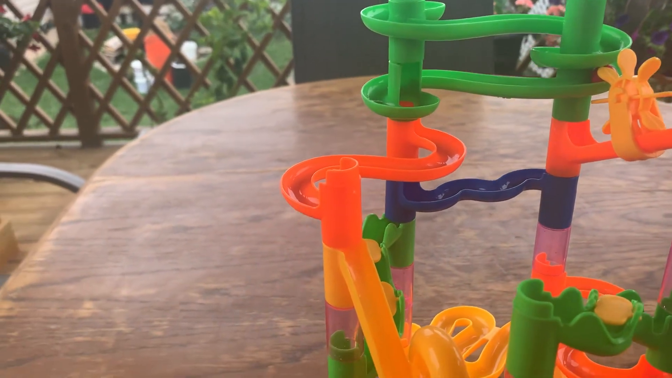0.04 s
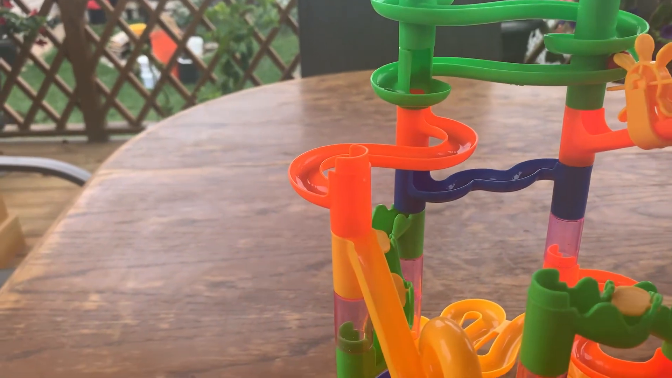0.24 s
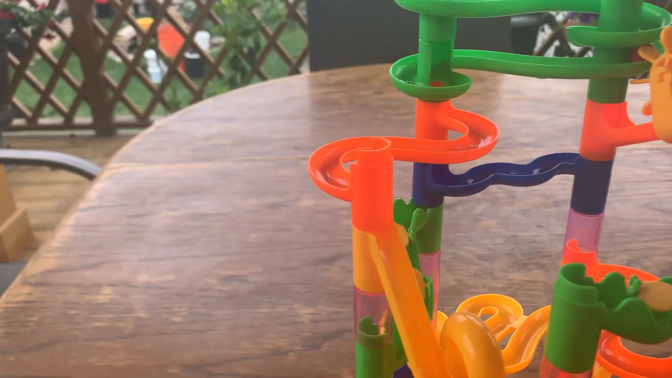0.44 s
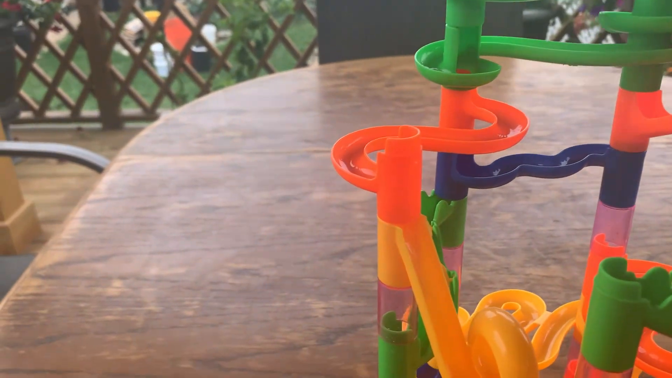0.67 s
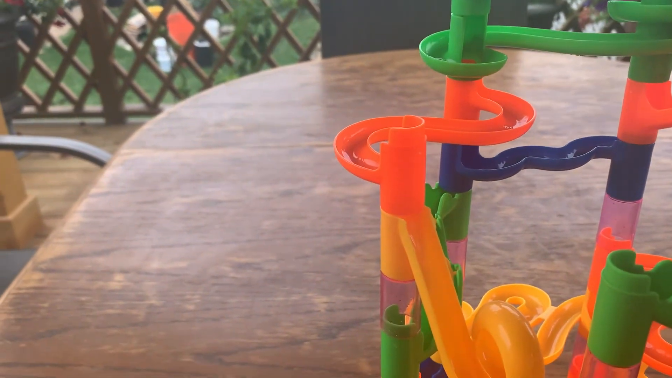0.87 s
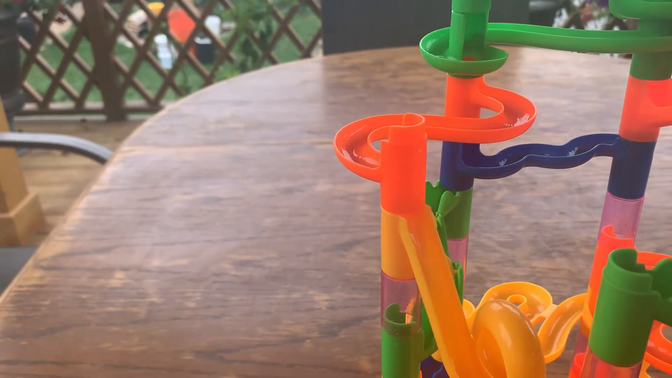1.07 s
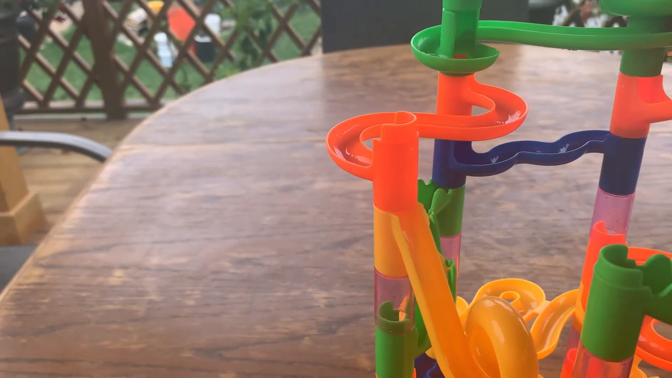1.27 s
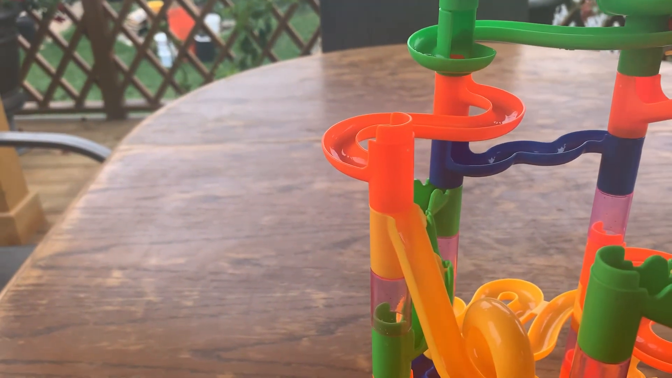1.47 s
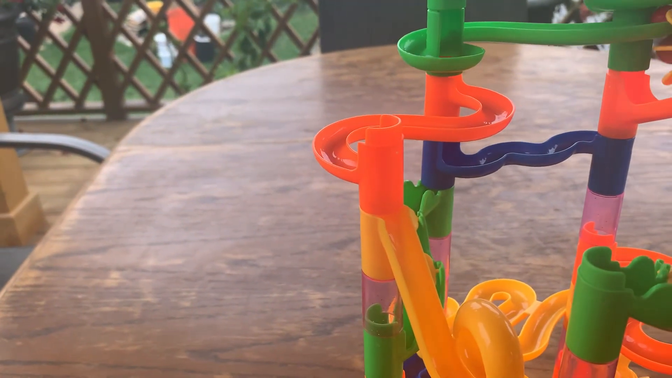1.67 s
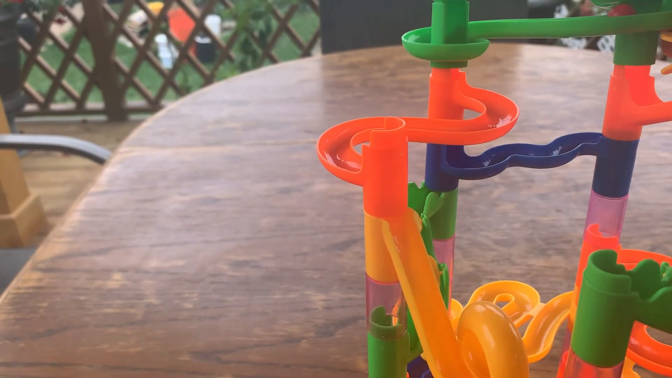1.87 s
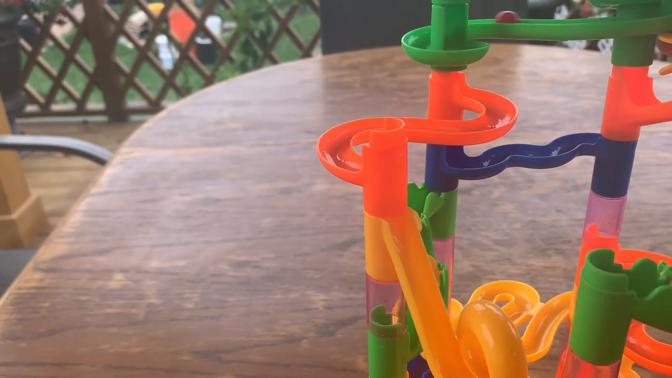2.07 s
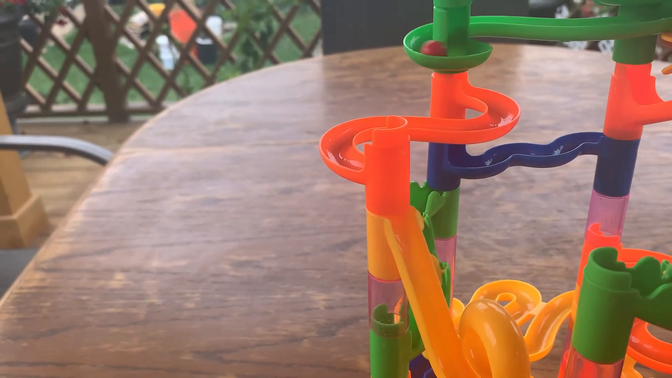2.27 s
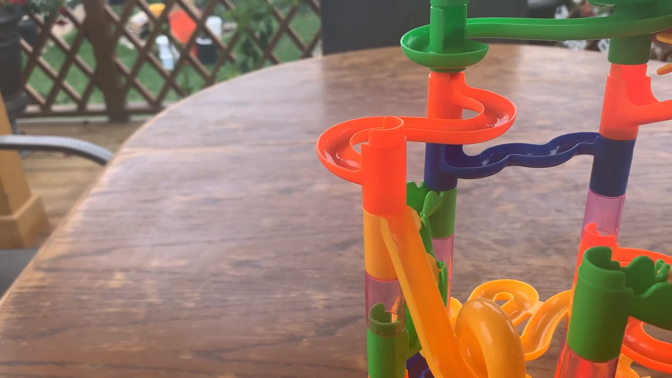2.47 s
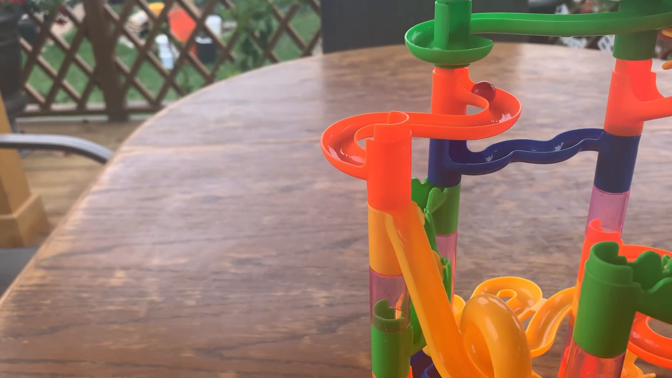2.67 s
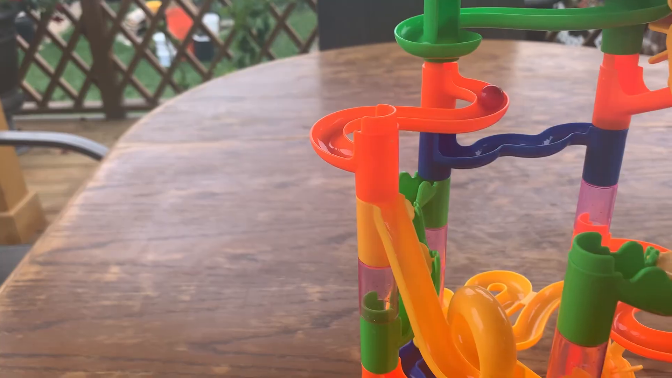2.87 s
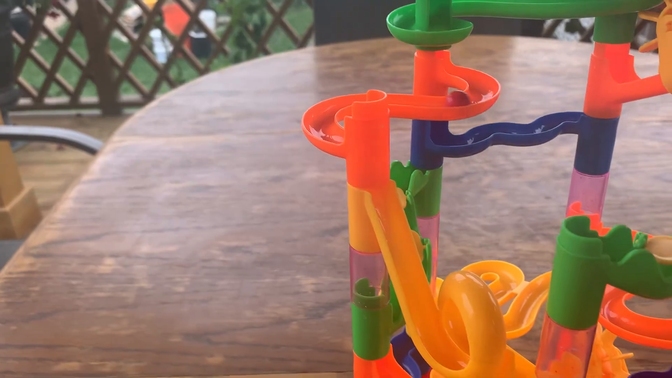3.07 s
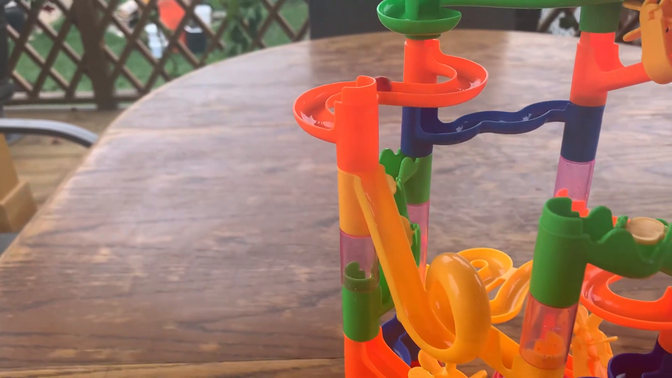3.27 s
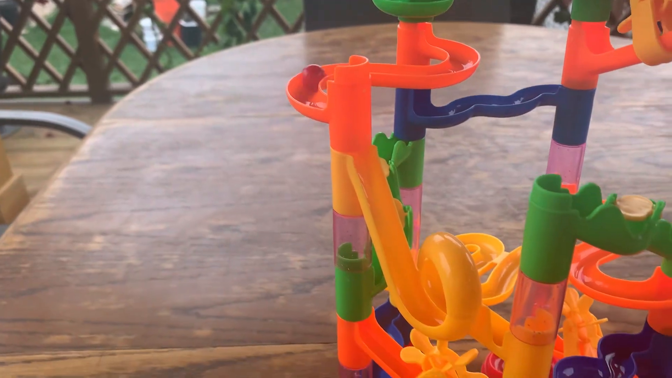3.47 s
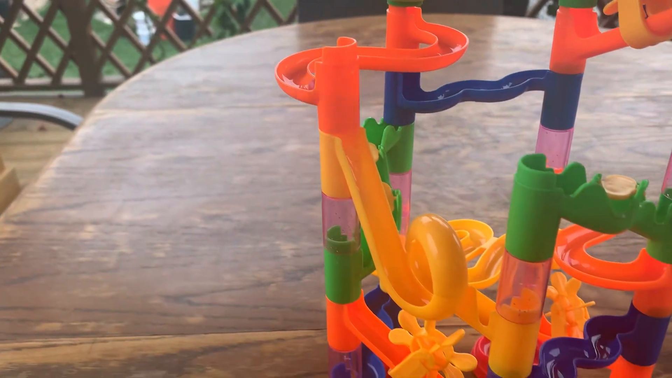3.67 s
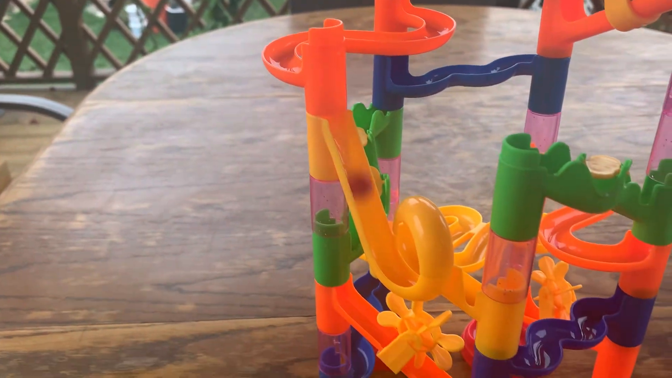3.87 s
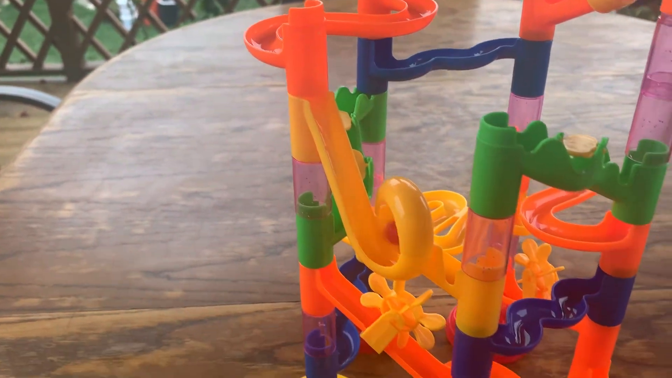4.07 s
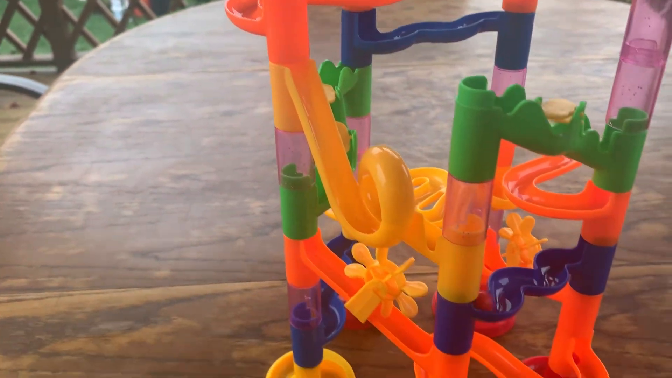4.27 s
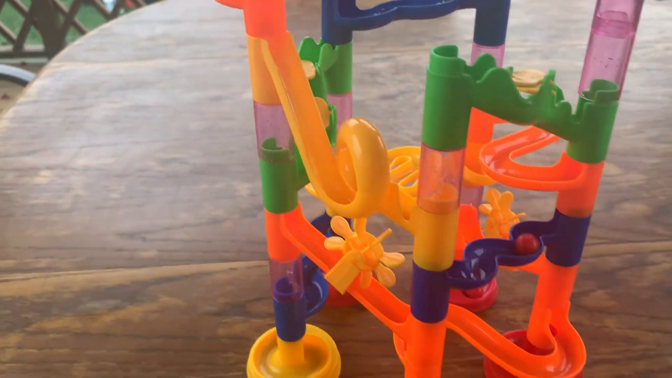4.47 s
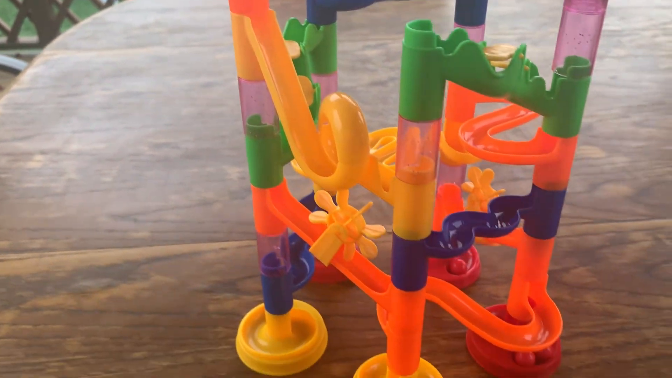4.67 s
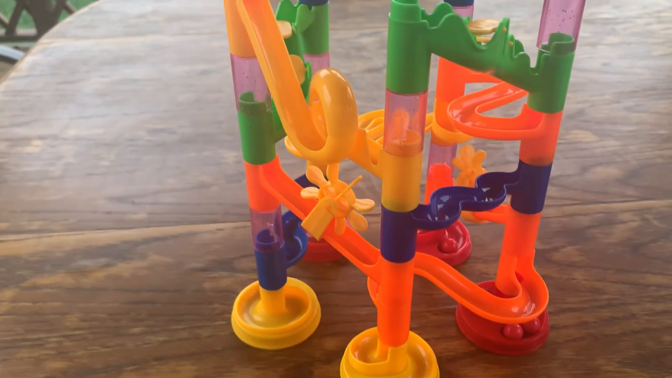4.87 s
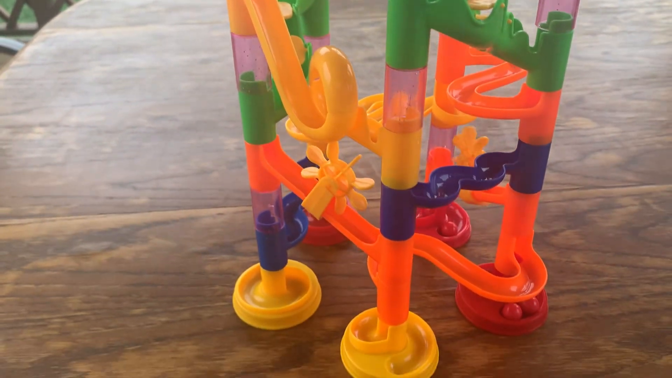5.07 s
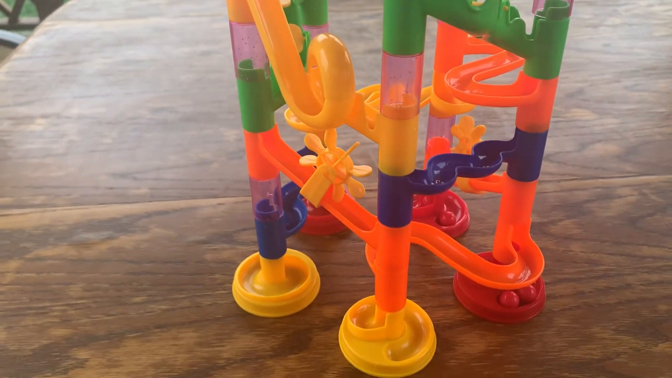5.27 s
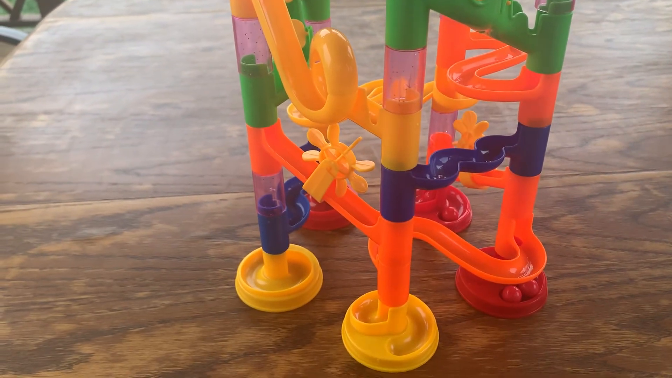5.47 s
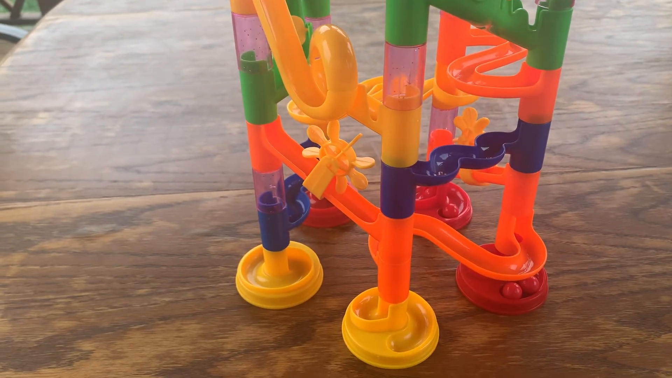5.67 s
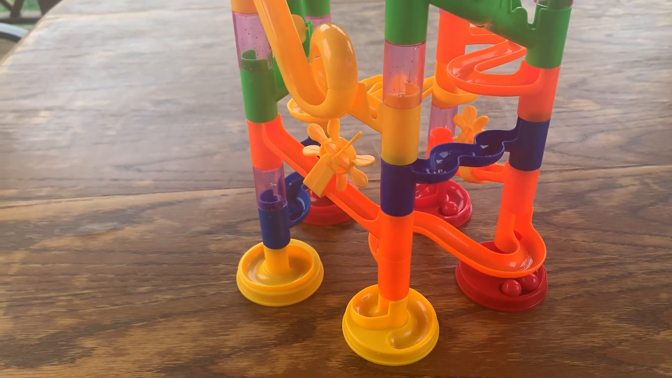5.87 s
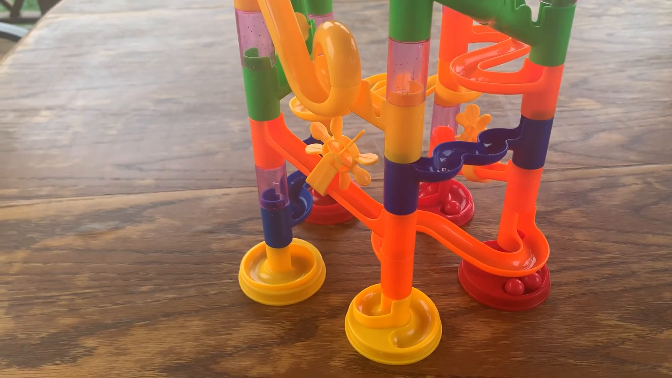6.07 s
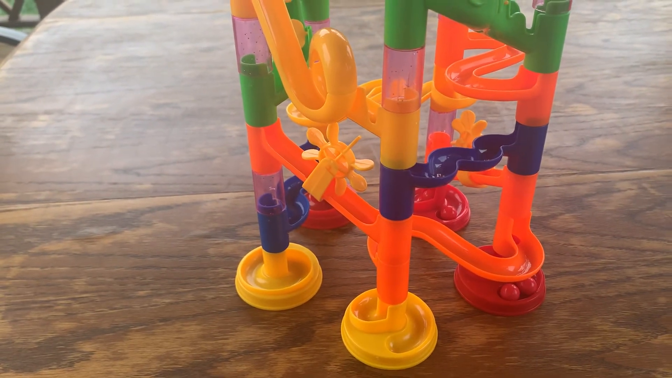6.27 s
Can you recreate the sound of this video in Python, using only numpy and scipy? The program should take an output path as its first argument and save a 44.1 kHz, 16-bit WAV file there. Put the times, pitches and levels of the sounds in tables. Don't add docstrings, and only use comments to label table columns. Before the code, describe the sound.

Faint distant traffic rumbles in the open air. At about 0.6 s a glass marble hits a plastic paddle close by with a light double click, then bounces weakly around 0.75 s and taps softly to 1.25 s. Quiet rolling and tiny joint ticks continue; from 1.9 s a rattle builds to rapid clicks at 2.2-2.35 s. At 2.5 s it drops hard with a sharp clack and quick rebound. A soft slide follows, with thin whining rail tones and ticks from 2.8 to 3.7 s. Crisp clatter breaks out at 3.7-4.0 s, then brighter, denser knocks at 4.07-4.27 s, and a bumpy run at 4.4-4.9 s, with short wooden thuds beneath. It lands hard at 5.0 s, bounces brightly to 5.1 s, and settles faintly by 5.3 s. Only low road noise remains until about 6.3 s.

```python
import sys
import numpy as np
from scipy import signal
from scipy.fft import rfft, irfft, next_fast_len
from scipy.io import wavfile
from scipy.ndimage import uniform_filter1d, map_coordinates

SR = 44100
rng = np.random.default_rng(int(sys.argv[2]) if len(sys.argv) > 2 else 0)


def store_wav(level_fs):
    pcm = np.round(np.clip(np.atleast_2d(level_fs), -1, 1) * 32767)
    wavfile.write(sys.argv[1], SR, pcm.T.astype(np.int16))


def elevation(decibels):
    levels = np.asarray(decibels, float)
    return 10 ** (levels / 20)


N = 279141
SIDES = np.array([[1], [-1]])

# frequency in Hz, time to fade by 60 dB in seconds.
PLASTIC_FADE = [(800, 0.057), (2500, 0.051), (6000, 0.019), (15000, 0.0081)]
# frequency in Hz, lead of the left port in radians.
PORT_LAG = [(0, 0), (1890, 0.2), (3010, 2.2), (4390, 0.6), (5170, 2.6), (6290, 0.0), (7920, -2.6),
            (9390, -3.7), (10500, -6.2), (11600, -6.6), (12700, -9.2), (14300, -9.8), (15200, -12.5),
            (16700, -12.4)]


def unit(x):
    return x / np.sqrt(np.mean(np.abs(x) ** 2) + 1e-20)


def along(points, hz):
    f, v = np.transpose(points)
    return np.interp(np.log(hz + 1), np.log(f + 1), v)


def wobble(rate):
    knots = rng.standard_normal(int(N * rate / SR) + 4)
    return map_coordinates(knots, [np.arange(N) * rate / SR])


def filtered(x, response):
    m = next_fast_len(N + SR // 2)
    return irfft(rfft(x, m) * response(np.fft.rfftfreq(m, 1 / SR)), m)[..., :N]


def add_at(out, piece, start):
    out[..., start:][..., :piece.shape[-1]] += piece


def contacts():
    # start in seconds, peak in dB, hollowness in dB, hardness in dB, strongest ring in Hz.
    paddle = [
        (0.6232, -32.5, -3.5, -7, 6360),
        (0.6369, -28, -4, -2.5, 1300),
        (0.744, -33, -7, -7.5, 1560),
        (0.7743, -36, -0.5, -7, 2255),
        (0.8904, -41.5, -1, -13, 1260),
        (0.9817, -42.5, 3, -11.5, 1600),
        (1.2038, -43, 5, -5, 1730),
        (1.2197, -48, 11.5, -8, 1334),
        (1.239, -47, 3, -13, 1660),
    ]
    funnel = [
        (2.4548, -26.5, -6.5, -4.5, 1753),
        (2.4911, -10.5, -11, -4, 4370),
        (2.514, -39.5, -18.5, -0.9, 6090),
        (2.5319, -20, -7, 0.5, 3090),
    ]
    chute = [(3.7197, -30, -8.5, -2.5, 6780), (3.7275, -21, -4.5, -2.05, 1500),
             (3.7423, -15, -4.5, -1.5, 4310), (3.7965, -25, -5.5, -1, 4440),
             (3.8072, -30.5, -4, -9.5, 4330), (3.8266, -34.5, -15, -19, 4100), (3.8803, -33, 0, -29, 1418),
             (3.8916, -36, -7.5, -12, 1370), (3.9073, -25.5, -5, -1.5, 2560),
             (3.9212, -19, -6.5, -15, 3180), (3.9339, -22.5, -11, -9, 3020),
             (3.945, -21.5, -2, -12.5, 2745), (3.9745, -38, -11, 5, 2380), (3.9934, -48.5, -4.5, -2, 2200)]
    zigzag = [(4.375, -39.5, -6.5, -24, 1915), (4.454, -36.5, -21, -22, 2100),
              (4.488, -37.5, -7, -10, 3700), (4.5055, -24, -8, -7, 1930), (4.544, -34.5, -6, -7, 1885),
              (4.6265, -14, -12, -10, 1754), (4.6447, -17.5, -12.5, -13.5, 4780),
              (4.6566, -28.5, -8, -9, 3970), (4.6665, -13, -6.5, -0.5, 1770), (4.7, -22.5, -17.5, -8, 1640),
              (4.748, -22, -9, -6.5, 1860), (4.784, -32, 2, 3, 7450), (4.7986, -27, -8.5, -6, 1610),
              (4.8177, -35, 0.5, -5.5, 1570), (4.8667, -37, -15.5, -14.5, 1920),
              (4.8874, -35.5, -10.5, -22.5, 1700)]
    dish = [
        (4.9377, -41.5, -1.5, -18, 1720),
        (4.9484, -30.5, -9.5, -19.5, 1680),
        (4.9864, -12, -9.5, -10, 1630),
        (5.0028, -25.5, -3.5, -2, 1830),
        (5.0246, -29.5, -3.5, 10.5, 7100),
        (5.033, -15.5, -3.5, 0.5, 7100),
        (5.0816, -20, -8.5, -8, 1500),
        (5.1123, -25.5, -9, -7.5, 1490),
        (5.2993, -55, 3, -4, 6830),
    ]
    nudges = [(0.75, -43, -5, 1, 1500), (0.901, -47, -4, -3, 1700), (1.1975, -53, -4, -1, 5200),
              (1.787, -70, -2, 2, 5700), (4.5, -58, -3, -23, 1260), (4.4276, -53, -1, -29, 1450),
              (4.473, -40, -2, -7, 1850), (4.94, -44, -8, -11, 5300), (4.2055, -24, -3.5, -3, 5400),
              (4.2, -37, -6, -5.5, 2600), (3.8, -62, -8, -4, 4600), (2, -53, -5.5, -15, 2400),
              (2.19, -46.5, -5.5, -17, 1900)]
    # start in seconds, peak in dB, hardness in dB, strongest ring in Hz.
    ramp = [(1.7786, -64, -1, 1230), (1.931, -45, -11, 4300), (1.9985, -44, -20, 2870),
            (2.0679, -44.5, -12, 4220), (2.1161, -44.5, -12, 1860), (2.154, -47, -8, 1890),
            (2.165, -41, -18.5, 1830), (2.2084, -40.5, -12.5, 2660), (2.2208, -35.5, -20, 2870),
            (2.251, -34.5, -12, 2800), (2.2569, -44.5, -7, 3155), (2.2655, -42.5, -8, 1930),
            (2.2775, -31.5, -10.5, 2010), (2.292, -31.5, -13, 4430), (2.3034, -36, -3, 3040),
            (2.3092, -30.5, -7, 2735), (2.3294, -42.5, -0.5, 1300), (2.3404, -35, -22, 1900)]
    bend = [(2.8421, -54.5, -66, 1414), (3.0643, -54, -26, 2844), (3.1053, -52, -34, 2920),
            (3.2131, -47, -21, 2950), (3.4465, -41, -9.5, 1390), (3.559, -43.5, -22.5, 1830),
            (3.5955, -42.5, -17.5, 1485), (3.6241, -42.5, -22, 1750), (3.6384, -50.5, -32.5, 1670),
            (3.6547, -41.5, -33.5, 2330), (3.677, -39.5, -21, 1280)]
    tube = [(4.0704, -14, 0, 3240), (4.0791, -19.5, -5.5, 6360), (4.0843, -11.5, -1.5, 3400),
            (4.1599, -24, -7.5, 3326), (4.1804, -34, -14.5, 3400), (4.194, -17.5, 0, 5350),
            (4.2037, -30, -11, 6634), (4.2108, -21.5, -11.5, 6930), (4.2283, -23, -3.5, 5650),
            (4.2432, -24.5, -9.5, 4320), (4.2464, -21, -6.5, 4070), (4.2647, -17.5, 0.5, 3990)]

    def rattle(rows, hollow_db):
        return [(s, db, hollow_db - 0.2 * (db + 34.5), hard_db, hz) for s, db, hard_db, hz in rows]

    upper = paddle + rattle(ramp, -6.5) + funnel + rattle(bend, -6)
    return upper + chute + rattle(tube, -2.5) + zigzag + dish + nudges


def knocks(count=14, lead=700):
    # frequency in Hz, level in dB per Hz.
    plastic = [(290, -53.5), (500, -26.5), (1400, -6.5), (2000, -7), (2650, -8.5), (3300, -6.5),
               (3660, -14), (4180, -6.5), (5870, -4), (6810, -0.5), (7600, 0), (8600, -0.5), (9500, 1.5),
               (10100, -1), (12500, -4.5), (13300, -9), (14600, -6), (15600, -8.5), (17000, -51.5)]
    out = np.zeros((2, N + SR))
    for s, db, hollow_db, hard_db, ring_hz in contacts():
        tilt = [(1700, hollow_db), (3500, 0.0035), (6500, 0.91 * hard_db), (11000, 1.1 * hard_db)]

        def colour_db(f):
            hump = 6 * np.exp(-(np.log((f + 1) / ring_hz) / 0.1) ** 2)
            return along(plastic, f) + along(tilt, f) + hump

        chance = rng.standard_normal((2, count))
        place = (np.arange(1, count) - rng.random(count - 1)) / count
        hz = np.append(ring_hz, 800 * (11000 / 800) ** place)
        level = elevation(colour_db(hz) + np.append(3, 2.4 * chance[0, 1:])) * np.sqrt(hz / 4000)
        t60 = 0.88 * along(PLASTIC_FADE, hz) * elevation(1.2 * chance[1])
        rings = strike(hz, level, t60, chatter_s=0.00078)
        body = clatter(colour_db, lead)
        start = round(s * SR)
        add_at(out, elevation(db - 1.5) * rings, start - 20)
        add_at(out, elevation(db - 4.0) * body, start - lead - 10)
    return out[:, :N]


def clatter(colour_db, lead, size=4096):
    t = (np.arange(size) - lead) / SR
    hz = np.fft.rfftfreq(size, 1 / SR)
    after = np.maximum(t, 0)
    bumps = map_coordinates(rng.standard_normal(size // 64 + 2), [np.arange(size) / 64], order=1)
    lumps = elevation(5.1 * (1 - np.exp(-np.abs(t) / 0.0039)) * bumps)
    rustle = elevation(-26.5 + 60 * np.minimum(t, 0) / 0.02)
    rise = (1 - np.exp(-after / 0.00074)) + rustle
    fade_s = np.array([[.011], [.08]])
    fast, slow = rise * lumps * elevation(-60 * after / fade_s)
    shared, own = rng.standard_normal((2, 2, size))

    def burst(k, envelope):
        return rfft((shared[k] + 0.3 * SIDES * own[k]) * envelope)

    slow_share = np.clip(along([(1500, 0.46), (5000, 0.22), (10000, 0.018)], hz), 0, 1)
    humps = map_coordinates(rng.standard_normal(size // 80 + 2), [np.arange(len(hz)) / 40])
    colour = elevation(colour_db(hz) + 3.5 * humps)
    middle = (hz > 2500) & (hz < 5000)
    colour = colour / np.sqrt(np.sum(colour[middle] ** 2) * 2 / size)
    lag = np.exp(.5j * SIDES * along(PORT_LAG, hz))
    return irfft((burst(0, fast) + slow_share * burst(1, slow)) * colour * lag, size)


def strike(hz, level, t60, chatter_s):
    t = np.arange(SR // 14) / SR
    chance = rng.random((2, len(hz)))
    modes = np.exp(((2j * np.pi * hz - np.log(1000) / t60)[:, None] * t).astype(np.complex64))
    lag = along(PORT_LAG, hz) + 2.6 * (chance[1] - .5)
    phase = 2 * np.pi * chance[0] + .5 * SIDES * lag
    rings = (level * np.exp(1j * phase) @ modes).imag * (1 - np.exp(-t / 0.0022))
    contact = t[:300] / chatter_s
    chatter = contact * np.exp(-contact) * rng.standard_normal(300) ** 3
    return signal.fftconvolve(rings, chatter[None] / np.linalg.norm(chatter), axes=1)


def ticks(count=24):
    # start in seconds, peak in dB, ring in Hz.
    joints = [(0.924, -54, 1402), (0.9923, -48, 1705), (1.2805, -42, 1910), (1.2986, -43.5, 1960),
              (1.3284, -50, 2060), (1.5755, -50.5, 1420), (1.6227, -50, 1860), (1.6578, -52.5, 1630),
              (1.7067, -63, 1740), (1.763, -52, 1890), (1.8144, -50.5, 2310), (2.3614, -51, 1920),
              (2.389, -50.5, 1800), (2.6566, -51, 2120), (2.6931, -58, 1555), (2.777, -58.5, 2220),
              (2.843, -52, 2346), (2.986, -64, 3020), (2.9073, -52.5, 1460), (3.0012, -49, 1377),
              (3.1817, -45, 2930), (3.4104, -39.5, 1526), (3.532, -53, 1920), (4.3437, -47, 1880),
              (4.4711, -34, 3820), (4.5594, -34, 1940), (4.8434, -45, 1750), (4.9069, -47.5, 1730),
              (5.1682, -52, 1596), (5.1936, -49.5, 1470), (5.219, -53, 1500), (5.249, -47, 1480),
              (5.2804, -63, 1480)]
    out = np.zeros((2, N + SR))
    for s, db, ring_hz in joints:
        spread = np.append(0, rng.standard_normal(count - 1))
        hz = np.clip(ring_hz * np.exp(0.19 * spread + 0.0074 * spread ** 2), 500, 15000)
        level = elevation(-7 * np.abs(spread) ** .5)
        blow = strike(hz, level, 0.4 * along(PLASTIC_FADE, hz), chatter_s=0.00073)
        add_at(out, elevation(db - 3.5) * blow, round(s * SR) - 20)
    return out[:, :N]


def singing():
    # start in seconds, level in dB, pitch in Hz, length in seconds, roughness in Hz.
    slides = [(2.115, -58.5, 1837, 0.13, 70), (3.058, -62, 2826, 0.062, 90), (3.166, -49, 2850, 0.068, 175),
              (3.255, -71, 2870, 0.035, 200), (3.311, -58.5, 4400, 0.051, 120),
              (3.36, -68, 4430, 0.07, 250), (3.305, -76, 6700, 0.078, 200), (3.34, -57, 1674, 0.08, 25.2),
              (3.306, -68, 2230, 0.092, 80), (3.35, -64, 3100, 0.065, 90), (3.292, -75, 5260, 0.12, 300),
              (3.3, -59, 1350, 0.125, 600), (3.159, -58.5, 1806, 0.1, 896),
              (3.163, -67.5, 4420, 0.084, 1200), (3.503, -68, 1890, 0.061, 594),
              (3.514, -63, 2850, 0.077, 199), (3.59, -58, 1700, 0.13, 897), (3.593, -53.5, 2800, 0.12, 600),
              (3.627, -64, 4300, 0.12, 496), (1.196, -52, 1904, 0.092, 910), (1.206, -60, 3280, 0.049, 500),
              (1.26, -62, 4430, 0.025, 700), (1.318, -70, 4500, 0.025, 794),
              (1.299, -71.5, 1863, 0.34, 798), (1.52, -78, 4300, 0.05, 596), (1.64, -77, 4260, 0.042, 808),
              (1.803, -70, 2680, 0.045, 900), (1.86, -74, 4700, 0.07, 1480), (4.33, -52, 1960, 0.06, 250),
              (4.351, -55, 3500, 0.045, 920), (4.425, -54, 3620, 0.03, 604), (4.428, -59, 1820, 0.058, 606),
              (4.545, -54, 1880, 0.05, 200), (4.578, -59, 2700, 0.038, 150), (4.79, -48, 1700, 0.073, 394),
              (4.892, -53.5, 1740, 0.07, 393), (5.121, -62, 1560, 0.12, 403),
              (5.139, -65, 4290, 0.084, 1200), (5.23, -67.5, 1550, 0.097, 496),
              (5.295, -61, 4090, 0.029, 900)]
    out = np.zeros((2, N))
    for s, db, pitch_hz, length, rough_hz in slides:
        t = np.arange(round(length * SR)) / SR
        knots = rng.standard_normal((3, 800))
        a, b, own = [map_coordinates(row, [t * rough_hz + 1]) for row in knots]
        swell = np.sin(np.pi * (t / length) ** 0.49) ** .5
        turn = np.exp(2j * np.pi * pitch_hz * t + .5j * SIDES * along(PORT_LAG, pitch_hz))
        shaking = a + 40 / rough_hz + 1j * b + 0.4 * own * SIDES
        add_at(out, elevation(db - 3.5) * swell * (shaking * turn).real, round(s * SR))
    return out


def roll_db():
    # start in seconds, end in seconds, hum at start in dB, hum at end in dB.
    stretches = [(0.616, 1.09, -67.5, -73), (1.25, 1.705, -86, -70.5), (1.816, 2.05, -63, -69),
                 (2.018, 2.34, -62.5, -54), (2.43, 2.705, -71.5, -73.5), (2.896, 3.138, -73, -75),
                 (3.162, 3.216, -71.5, -64.5), (3.313, 3.467, -60.5, -61), (3.5, 3.7, -67, -60),
                 (3.742, 3.836, -47, -58.5), (3.863, 3.962, -63, -48), (4.066, 4.25, -55.5, -44.5),
                 (4.3, 4.612, -57.5, -66), (4.622, 5.192, -60.5, -64)]
    set_off_db_per_s, let_go_db_per_s = 398, 191
    t = np.arange(N) / SR

    def stretch(start, end, from_db, to_db):
        before = set_off_db_per_s * np.maximum(start - t, 0)
        after = let_go_db_per_s * np.maximum(t - end, 0)
        return np.interp(t, [start, end], [from_db, to_db]) - before - after

    return np.max([stretch(*row) for row in stretches], axis=0)


def rolling():
    # frequency in Hz, width in Hz, level in dB.
    rail_tones = [(1200, 170, 9.5), (1830, 59, 8), (2120, 61, -2.5), (3070, 98, -2), (3820, 41, -14),
                  (4460, 66, -8), (4800, 300, -10)]
    # frequency in Hz, level in dB per Hz.
    hiss_colour = [(2000, -33.5), (3000, 4.5), (7000, -12.5), (11000, -15.5), (16000, -30.5)]
    grit_per_s, grit_db = 90, 15
    hum_db = roll_db()
    hum = elevation(hum_db)
    hiss = elevation(-68 + 2.2 * (hum_db + 61.5))
    bumps = rng.standard_normal((2, N)) * elevation(2 * wobble(25) + 3 * wobble(130) + 3 * wobble(600))
    flicks = elevation(grit_db) * (rng.random(N) < grit_per_s / SR) * rng.standard_normal((2, N))

    def peak(f, hz, width):
        return 1j * f * width / (hz * hz - f * f + 1j * f * width)

    def rails(f):
        tones = sum((-1) ** k * elevation(db) * peak(f, hz, width)
                    for k, (hz, width, db) in enumerate(rail_tones))
        broad = elevation(3.0) * peak(f, 1750, 1000) ** 2
        return (tones + broad) * f ** 2 / (f ** 2 + 800 ** 2)

    shake = unit(filtered(bumps + uniform_filter1d(flicks, size=7, axis=1) * 2, rails))
    rustle = unit(filtered(bumps * elevation(1.58 * wobble(240)), lambda f: elevation(along(hiss_colour, f))))
    return ports(hum * shake + hiss * rustle, alike=0.66)


def ports(x, alike):
    def lag(hz):
        return np.exp(.5j * along(PORT_LAG, hz) * SIDES)

    return filtered(np.sqrt(alike) * x[0] + np.sqrt(1 - alike) * x[1] * SIDES, lag)


def table():
    # frequency in Hz, level in dB, time to fade by 60 dB in seconds.
    wood_tones = [(196, 2.5, 0.096), (312.7, 2, 0.055), (441, -2, 0.089), (700, -12, 0.013)]
    # start in seconds, level in dB, frequency in Hz.
    thuds = [(0.743, -42.5, 117.3), (0.987, -46.5, 119), (1.208, -39, 107), (2.491, -43.5, 152.3),
             (3.739, -45, 174.4), (3.923, -42, 169), (4.198, -45.5, 242.6), (4.248, -44.5, 166.5),
             (4.505, -46, 205.7), (4.665, -39.5, 123), (4.801, -44, 129.3), (4.991, -40, 119.7),
             (5.038, -37.5, 127.7)]
    blows = np.zeros(N)
    t = np.arange(SR // 3) / SR
    for s, db, hollow_db, *_ in contacts():
        blows[round(s * SR)] = elevation(db + hollow_db - 23.0) * rng.choice([-1, 1])
    top = sum(elevation(db - 60 * t / t60) * np.sin(2 * np.pi * hz * t) for hz, db, t60 in wood_tones)
    out = signal.fftconvolve(blows, top * (1 - np.exp(-t / 0.0054)))
    for s, db, hz in thuds:
        swing = elevation(db + 2.5 - 60 * t / 0.34) * (1 - np.exp(-t / 0.025))
        add_at(out, swing * np.sin(2 * np.pi * hz * t), round(s * SR))
    return out[:N]


def patio(x):
    # frequency in Hz, time to fade by 60 dB in seconds.
    echo_fade = [(500, 0.4), (2000, 0.18), (6000, 0.15), (14000, 0.084)]
    out = np.zeros((2, N + SR))
    step = SR // 8
    for start in range(0, N, step):
        hz, t, z = signal.stft(rng.standard_normal((2, SR // 3)), SR, nperseg=256)
        fade_db = -60 * t / along(echo_fade, hz)[:, None] - 4 * hz[:, None] / 10000
        tail = signal.istft(z * elevation(fade_db), SR, nperseg=256)[1]
        tail = tail[0] + 0.15 * tail[1] * SIDES
        answer = signal.fftconvolve(x[:, start:start + step], tail / np.linalg.norm(tail[0]), axes=1)
        add_at(out, answer, start + 150)
    return out[:, :N]


def traffic():
    # time in seconds, swell in dB.
    swells = [
        (0, 1.4),
        (.5, 0.2),
        (.9, 2.5),
        (1.8, 1.5),
        (2.6, -0.1),
        (3.7, 0.5),
        (4.9, 5),
        (5.4, -2),
        (6.33, -2),
    ]
    # frequency in Hz, level in dB per Hz.
    rumble_colour = [(12, -50.5), (27, -23), (41, -8.5), (65, -3.5), (226, -17.5), (274, -21.5),
                     (450, -32.5), (580, -64.5), (990, -120)]
    wash_colour = [(210, -34.5), (350, -4), (405, -11.5), (776, -1.5), (1200, -9.5), (1530, -17.5),
                   (1930, -22), (2500, -26), (3940, -30.5), (7660, -34.5), (8200, -47), (9200, -45),
                   (9800, -32), (12200, -33), (13200, -49.5), (17000, -49.5)]
    seconds, swell_db = np.transpose(swells)
    swell = elevation(np.interp(np.arange(N) / SR, seconds, swell_db))
    rumble = elevation(-54.5 + 0.88 * wobble(3.4)) * swell ** .7 * rush(rumble_colour, patchy_db=1.43)
    wash = elevation(-66 + 0.45 * wobble(1.9)) * swell * rush(wash_colour, patchy_db=3.0)
    return rumble + wash


def rush(spectrum, patchy_db):
    # frequency in Hz, likeness of left and right from -1 to 1.
    likeness = [(25, 1), (130, 0.89), (290, 0.57), (640, -0.47), (1400, -0.12), (15000, -0.081)]
    z = signal.stft(rng.standard_normal((2, N)), nperseg=1024)[2]
    field = uniform_filter1d(rng.standard_normal(z.shape[1:]), size=6, axis=0)
    field = uniform_filter1d(field, size=8, axis=1)
    pair = signal.istft(z * elevation(patchy_db * unit(field)), nperseg=1024)[1][:, :N]

    def shape(hz):
        turn = np.arccos(np.clip(along(likeness, hz), -1, 1)) / 2
        return elevation(along(spectrum, hz)) * [np.cos(turn), np.sin(turn)]

    mid, side = filtered(pair, shape)
    return unit(np.array([mid + side, mid - side]))


def scene():
    marble = elevation(1.5) * knocks() + ticks() + singing()
    mix = marble + elevation(-11.0) * patio(marble) + rolling() + table() + traffic()
    return mix * elevation([[-.7], [.7]])


def low_pass(x):
    return signal.sosfilt(signal.butter(12, 17140, fs=SR, output="sos"), x)


def record(dry):
    # frequency in Hz, width in Hz, level in dB.
    dips = [(8370, 474, -1), (14200, 420, -4), (17500, 1100, -30.5)]

    def housing(f):
        return elevation(sum(db * np.exp(-((f - hz) / width) ** 2) for hz, width, db in dips))

    rounded = .95 * np.tanh(filtered(dry, housing) / .95)
    return low_pass(rounded)


dry = scene()
out = record(dry)
store_wav(out)
```